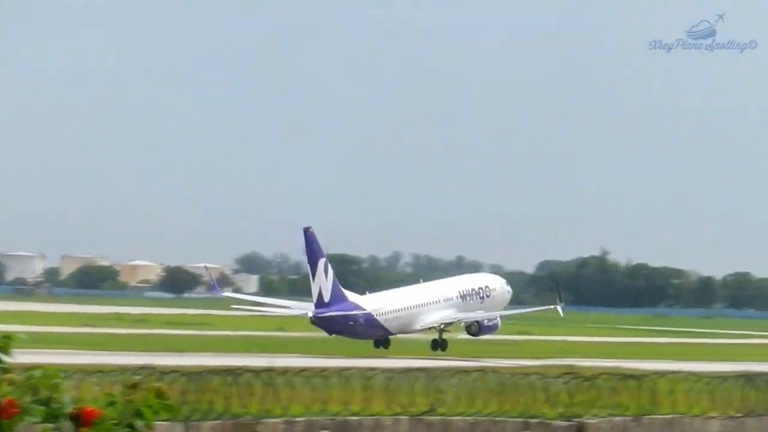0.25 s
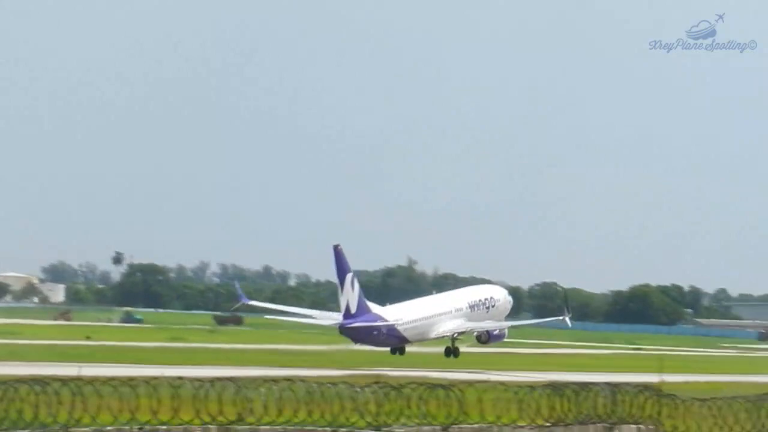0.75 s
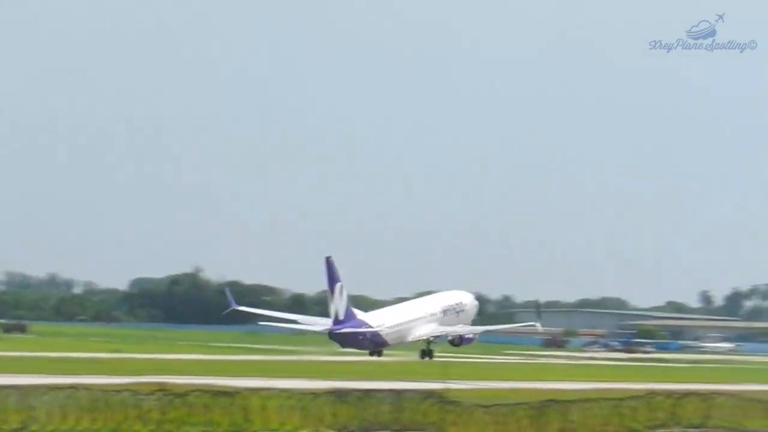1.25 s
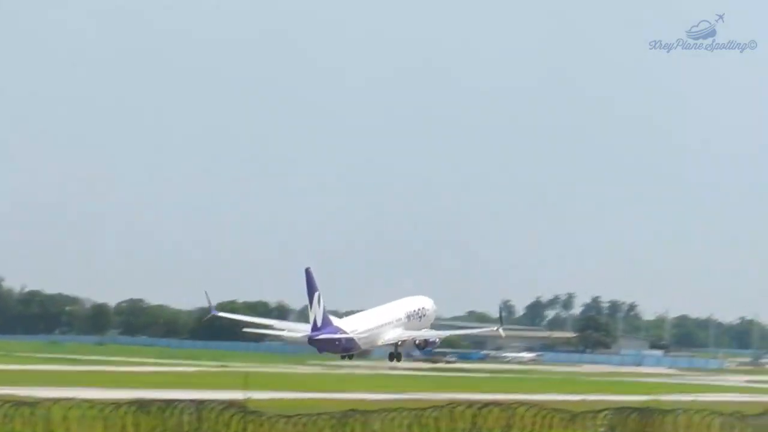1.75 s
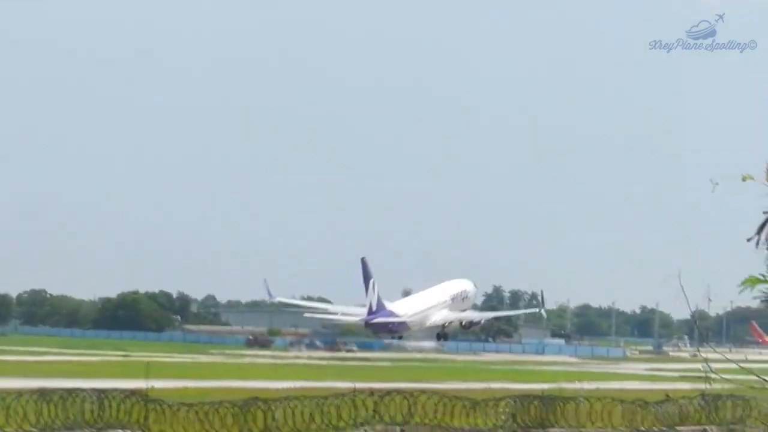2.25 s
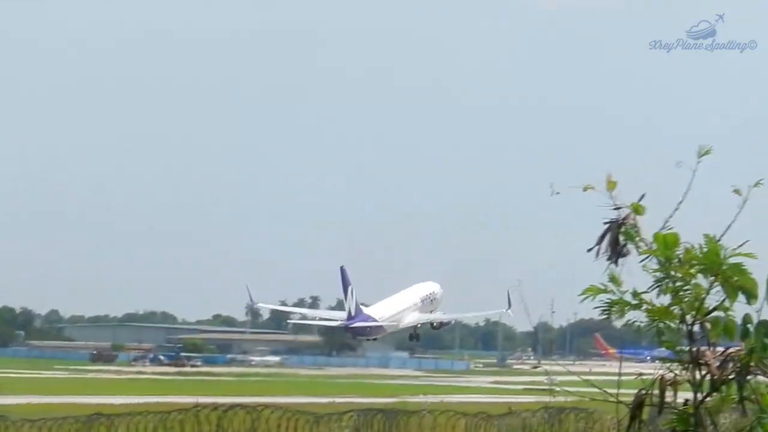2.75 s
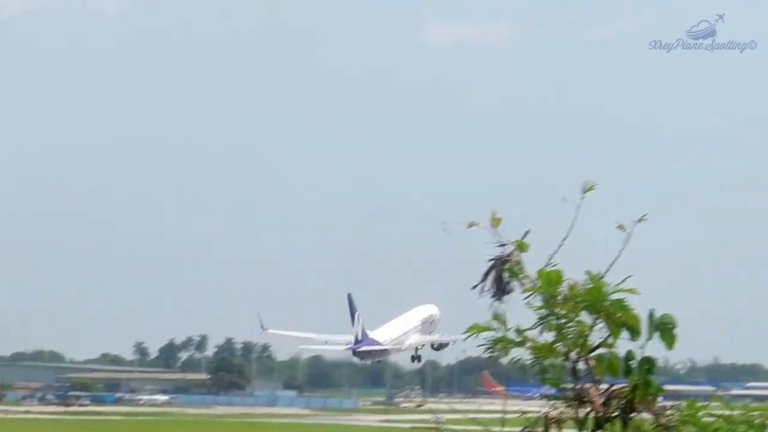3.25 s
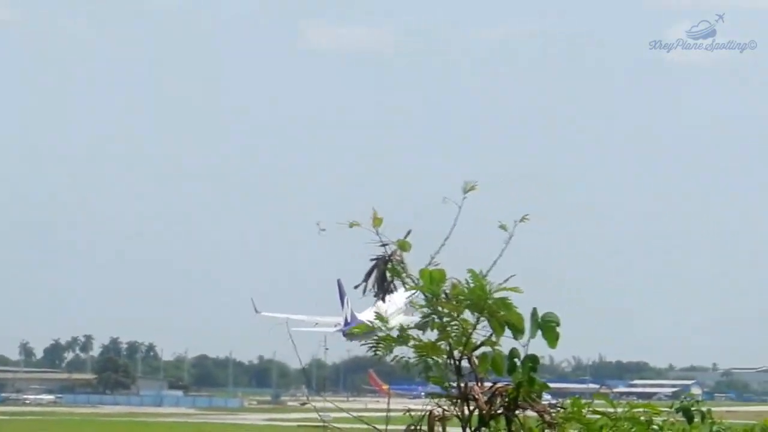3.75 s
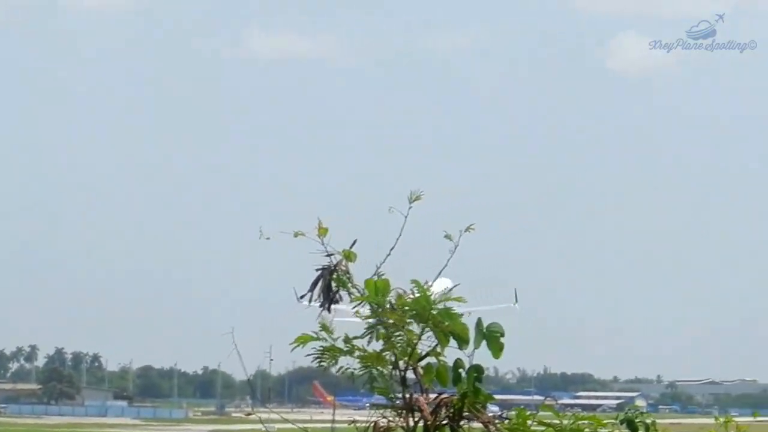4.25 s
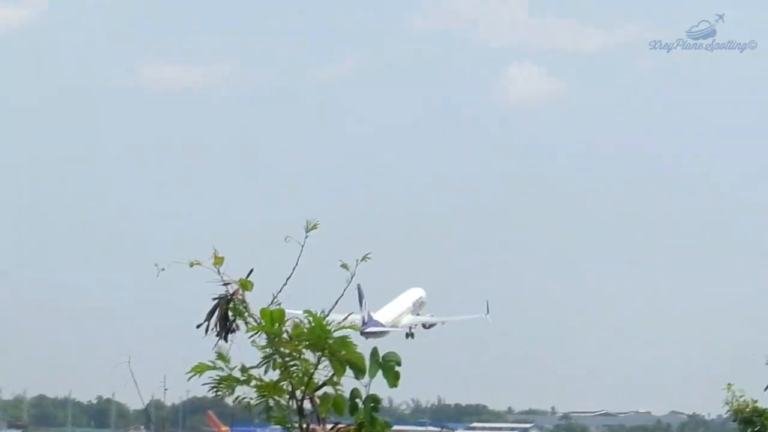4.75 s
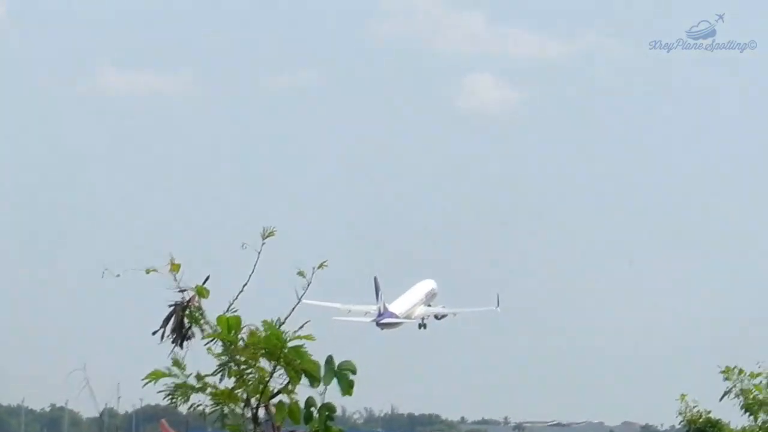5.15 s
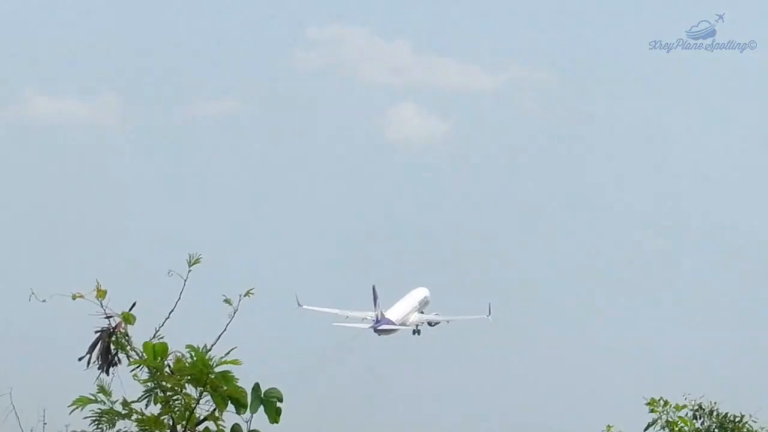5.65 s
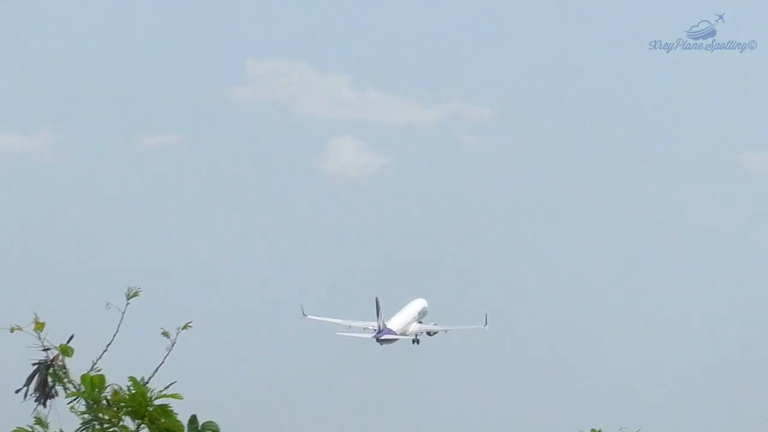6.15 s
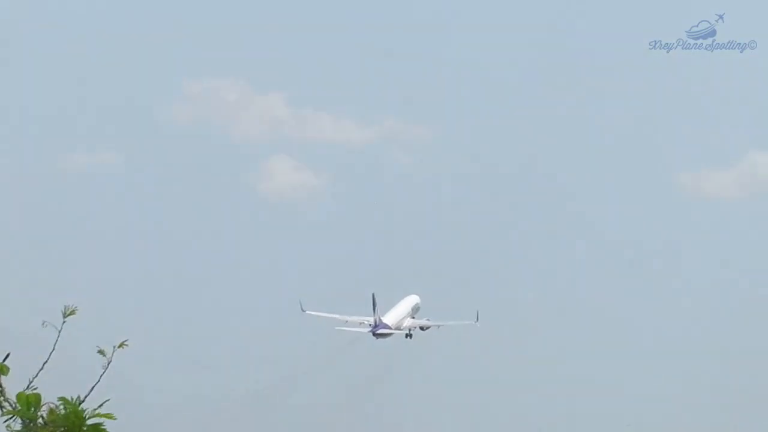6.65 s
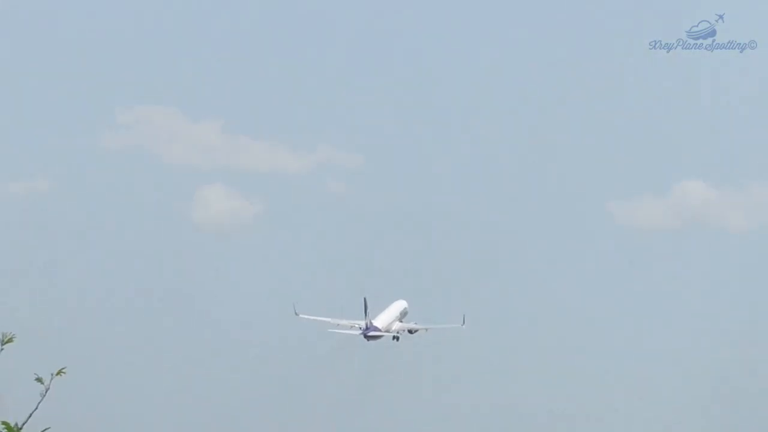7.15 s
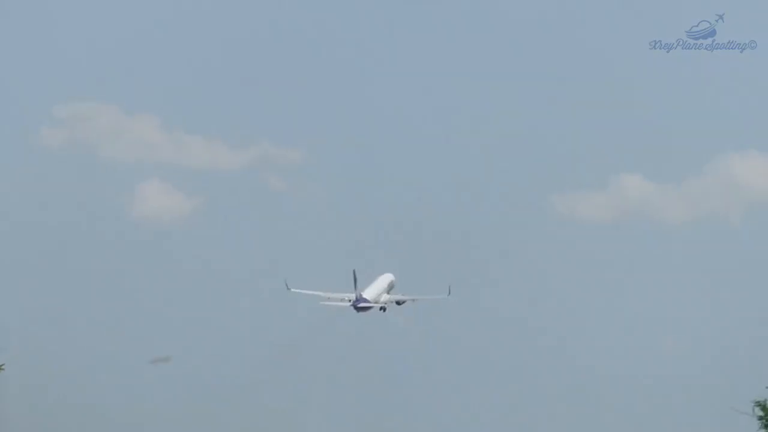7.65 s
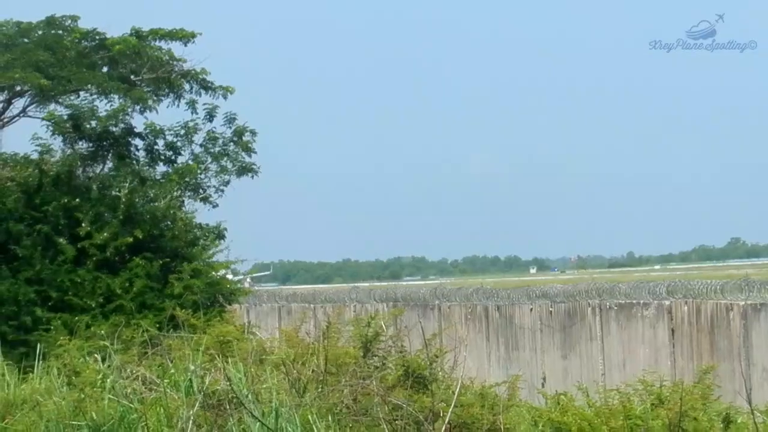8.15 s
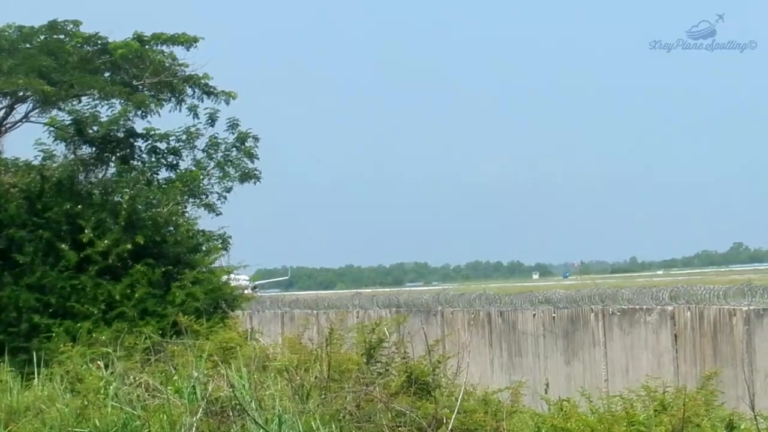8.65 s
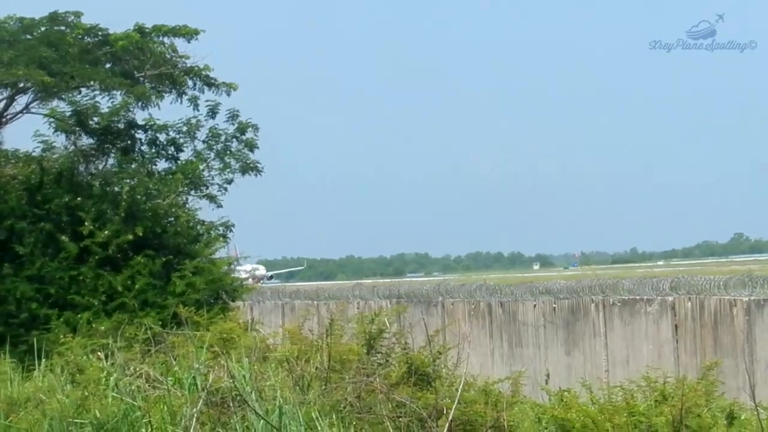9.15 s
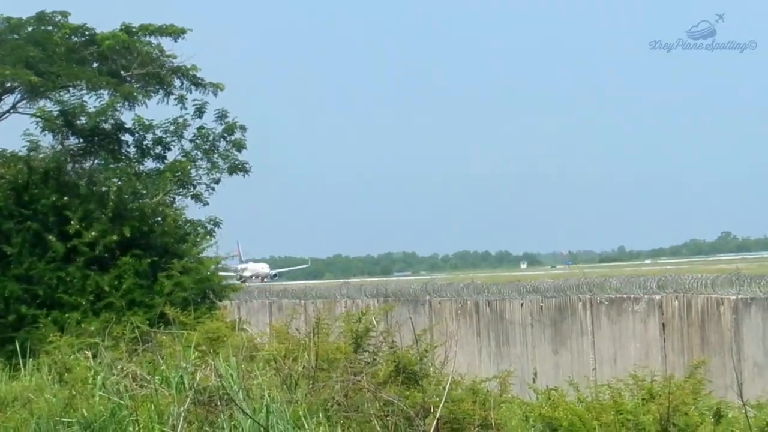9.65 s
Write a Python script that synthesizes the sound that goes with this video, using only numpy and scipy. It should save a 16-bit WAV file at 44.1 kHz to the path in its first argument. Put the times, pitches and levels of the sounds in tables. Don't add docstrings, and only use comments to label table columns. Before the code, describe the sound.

Outdoors beside an airfield, a twin-engine jet takes off and climbs away. Deep exhaust rumble and broad roar start at once, with a brief fan whine that soon fades. The overloaded small stereo microphone ducks and ticks repeatedly. At about eight seconds it cuts abruptly to a much quieter distant jet idling, with knocks on the microphone case and a final puff of wind.

```python
import sys
import numpy as np
from scipy import signal
from scipy.fft import rfft, irfft, next_fast_len
from scipy.io import wavfile
from scipy.ndimage import uniform_filter1d

SR = 44100
rng = np.random.default_rng(int(sys.argv[2]) if len(sys.argv) > 2 else 0)


def wrap_up_sound(samples):
    columns = np.atleast_2d(samples).T
    tamed = np.clip(columns, -1, 1)
    steps = np.round(tamed * 32767).astype(np.int16)
    wavfile.write(sys.argv[1], SR, steps)


def volts_from_db(level):
    exponent = np.asarray(level, float) / 20
    return 10 ** exponent


N = 436149
TIME = np.arange(N) / SR
SIZE = next_fast_len(N)
BINS_HZ = np.maximum(np.arange(SIZE // 2 + 1) * SR / SIZE, 1)
CUT_S = 8.0885
CLIMBING, IDLING = 0, 1


def rms_one(x):
    return x / np.sqrt(np.mean(x ** 2) + 1e-20)


def in_time(rows):
    s, *columns = np.transpose(rows)
    return [np.interp(TIME, s, column) for column in columns]


def at_hz(points, hz):
    points_hz, values = np.transpose(points)
    return np.interp(np.log(hz), np.log(points_hz), values)


def bumps(rows):
    return sum(db * np.exp(-((TIME - s) / half_s) ** 2) for s, db, half_s in rows)


def drift(rate_hz):
    pole = np.exp(-80 * np.pi * rate_hz / SR)
    chance = rng.standard_normal(N // 40 + 2002)
    slow = signal.lfilter([1], [1, -2 * pole, pole * pole], chance)[2000:]
    return np.interp(np.arange(N) / 40, np.arange(len(slow)), rms_one(slow))


# (centre [Hz], width [Hz], depth [dB])
HOUSING = [(1373, 146, -5), (1793, 230, -6), (2327, 200, -6.5), (2940, 140, -6), (4000, 170, -5),
           (4700, 67, -1), (6940, 360, -5)]
# (frequency [Hz], likeness [-1 to 1])
LIKENESS = [
    [(60, 0.99), (150, 0.89), (390, 0.99), (990, 1), (2530, 0.68), (6440, 0.6)],
    [(60, 0.14), (190, 1), (620, 0.84), (2000, 0.32), (6440, -0.33)],
]
# (frequency [Hz], left minus right [dB])
LEAN = [(60, -6.5), (120, -4.5), (230, -4), (450, -4), (870, -1.5), (1690, -1), (3300, 1), (6440, 4)]


def stereo_noise(colour, shot):
    mid, side = rfft(rng.standard_normal((2, SIZE)))
    alike = at_hz(LIKENESS[shot], BINS_HZ)
    pair = np.sqrt(1 + alike) * mid + np.sqrt(1 - alike) * side * [[1], [-1]]
    outside = (BINS_HZ < colour[0][0]) | (BINS_HZ > colour[-1][0])
    level_db = at_hz(colour, BINS_HZ) - 80 * outside
    level_db += sum(db * np.exp(-((BINS_HZ - hz) / width) ** 2) for hz, width, db in HOUSING)
    lean = volts_from_db(at_hz(LEAN, BINS_HZ) / 2 * np.array([[1], [-1]]))
    left_lead_rad = 0.33 * np.array([[1], [0]])
    return pair * lean * volts_from_db(level_db) * np.exp(1j * left_lead_rad)


# (frequency [Hz], density [dB per Hz])
RUMBLE_COLOUR = [
    [(12, -43.5), (20, -39), (62, -3), (81, 5), (116, -5), (178, -25), (220, -43.5), (290, -39.5),
     (480, -120)],
    [(12, -79), (20, -40), (48, -26), (59, -10.5), (74, -5.5), (92, -0.5), (127, -6.5), (173, -24.5),
     (220, -42), (290, -61), (480, -120)],
]
RUMBLE_DB = [-16.5, -27]
# (time [s], level [dB], half length [s])
EDDIES = [
    [(0.38, 2, 0.045), (0.55, -3, 0.078), (0.85, -7, 0.027), (0.92, 6, 0.025), (1.39, -11.5, 0.025),
     (1.69, 2.5, 0.11), (2.01, -8.5, 0.02), (2.59, -8.5, 0.038), (2.82, -5.5, 0.03), (3.07, -6, 0.023),
     (3.27, 5.5, 0.035), (3.44, -5, 0.03), (3.89, 1.5, 0.064), (4.11, -3, 0.032), (4.3, 3.5, 0.037),
     (4.48, 4, 0.016), (4.87, -7, 0.079), (5.25, -7.5, 0.027), (5.36, 3, 0.021), (5.53, -6, 0.033),
     (5.6, 3.5, 0.021), (5.9, -6, 0.055), (6.18, -8, 0.019), (6.39, 4.5, 0.042), (6.51, -6.5, 0.048),
     (6.6, 6, 0.026), (6.91, -4.5, 0.051), (7.28, -7, 0.03), (7.47, 5, 0.021), (8.06, -4, 0.13)],
    [(8.2, -8, 0.041), (8.32, -5, 0.034), (8.58, 5, 0.03), (8.98, 2, 0.11), (9.23, -6, 0.082),
     (9.52, 4.5, 0.024), (9.58, -6, 0.024), (9.67, -5, 0.024), (9.86, 7.5, 0.12)],
]


def rumble(shot, evenness, deep_follow):
    pair = stereo_noise(RUMBLE_COLOUR[shot], shot)
    deep_share = np.clip(np.log2(65 / BINS_HZ), 0, 1)
    hump = irfft(pair * np.sqrt(1 - deep_share), SIZE)[:, :N]
    deep = irfft(pair * np.sqrt(deep_share), SIZE)[:, :N]
    scale = np.std(hump.mean(0))
    power = (hump.mean(0) / scale) ** 2
    power = uniform_filter1d(uniform_filter1d(power, size=900), size=900)
    hump = hump / (power + 0.02) ** (evenness / 2)
    swell_db = RUMBLE_DB[shot] + bumps(EDDIES[shot])
    slow_db = uniform_filter1d(swell_db, size=20000)
    deep_db = slow_db + 3.0 + deep_follow * (swell_db - slow_db)
    return (volts_from_db(swell_db) * hump + volts_from_db(deep_db) * deep) / scale


# (frequency [Hz], density [dB per Hz])
ROAR_COLOUR = [
    [(94, -22), (160, -12.5), (199, -4), (357, -3), (1130, -9), (1590, -16.5), (1750, -20.5), (2050, -19.5),
     (2330, -28), (3290, -29.5), (6890, -48), (8960, -81.5), (15200, -120)],
    [(94, -31), (160, 3.5), (307, -2.5), (348, -7), (385, -5.5), (540, -11), (1990, -29.5), (2170, -32),
     (3200, -62), (4160, -90), (7040, -120)],
]
ROAR_CENTRES_HZ = [220, 460, 1000, 2800]
ROAR_BALANCE_DB = [
    [-38, -31, -35, -47],
    [-48, -44.5, -51.5, -62.5],
]
# (time [s], level [dB], brightness [dB per octave])
ROAR_PATH = [
    [(0.0, 3, 3), (0.5, 3, 0.6), (1.0, -0.15, 2.5), (1.5, -1, 1.3), (2.05, -3.5, 1.4), (2.4, 2, 2.3),
     (2.75, 2.5, 3.5), (3.15, 0, 1.5), (3.5, -3, 0), (4.2, -0.5, 0.1), (4.8, 0.3, 0), (5.5, 2.5, 0.2),
     (6.1, -1.2, -0.4), (6.9, -0.8, -2.0), (7.5, -2.0, -1.5), (8.08, -3, -3)],
    [(8.1, 0, -0.5), (8.6, 0, 0), (9.89, -0.5, 1)],
]
# (time [s], slope above the top centre [dB per octave])
AIR_DB_PER_OCTAVE = [
    (0, 5.5),
    (2, -2),
    (8, -12),
]
# (time [s], level [dB], half length [s], centre [Hz])
POCKETS = [(0.19, 5.5, 0.075, 1700), (0.2, 6.5, 0.036, 6000), (0.26, -4.5, 0.35, 420),
           (0.48, -4.5, 0.087, 3400), (0.7, 3, 0.2, 850), (2.25, 3.5, .5, 210), (2.548, -1.5, 0.32, 600),
           (2.59, 4, 0.25, 1700), (3.587, -5.5, 0.11, 292), (3.647, 4.5, 0.7, 1170),
           (3.669, -2, 0.55, 3400), (4.688, 5, 0.14, 855), (5.518, -5.5, 0.2, 210), (5.673, 5.5, 0.76, 420),
           (6.212, -7.5, .1, 210), (6.532, -3, .3, 1210), (7.44, -3, 0.84, 1150), (7.66, 3, .18, 420)]


def roar(shot, patchy_db):
    pair = stereo_noise(ROAR_COLOUR[shot], shot)
    path_db, brightness = in_time(ROAR_PATH[shot])
    air_slope = in_time(AIR_DB_PER_OCTAVE)[0]
    edges = np.searchsorted(BINS_HZ, [170, 300, 700, 1500, 6500])
    power = np.abs(pair.mean(0)) ** 2 * 2 / SIZE ** 2
    region_power = [power[a:b].sum() for a, b in zip(edges, edges[1:])]
    balance_db = ROAR_BALANCE_DB[shot] - 10 * np.log10(region_power)
    third_hz, top_hz = ROAR_CENTRES_HZ[-2:]
    out, together, neighbour = 0, drift(18), drift(2.6)
    for hz in 150 * 2 ** np.arange(0, 6.5, .5):
        window = np.cos(np.pi * np.clip(np.log2(BINS_HZ / hz), -.5, .5)) ** 2
        level_db = np.interp(np.log(hz), np.log(ROAR_CENTRES_HZ), balance_db) + path_db
        level_db += brightness * np.log2(min(hz, top_hz) / third_hz)
        for s, db, half_s, centre_hz in POCKETS:
            octaves = np.log2(hz / centre_hz)
            if abs(octaves) < 2:
                level_db += bumps([(s, db * np.exp(-(octaves / 0.8) ** 2), half_s)])
        air_db = air_slope * max(np.log2(hz / top_hz), 0)
        own = drift(11.0)
        flicker_db = patchy_db * (0.25 * together + 0.62 * own + 0.5 * neighbour)
        out = out + volts_from_db(level_db + air_db + flicker_db) * irfft(pair * window, SIZE)[:, :N]
        neighbour = own
    return out


# (time [s], lag [ms], strength [0-1])
GROUND = [(0, 0.32, 0.3), (1.8, 0.34, 0), (2.3, 0.95, 0.26), (3.2, 0.71, 0.23), (4, 1.08, 0.17),
          (4.8, 2.22, 0.2), (6, 2.27, 0.08), (7, 2.9, 0), (8.1, 3.1, 0.1)]


def ground_echo(x):
    lag_ms, strength = in_time(GROUND)
    dull = signal.sosfilt(signal.butter(1, 2200, fs=SR, output="sos"), x)
    echo = np.array([np.interp(TIME - lag_ms / 1000, TIME, channel) for channel in dull])
    return (x + strength * echo) / np.sqrt(1 + strength ** 2 / 2)


def whine(start_s, law, flares, tones, wobble, fading_db):
    level_db, db_per_s, speed_up = law
    since_s = TIME - start_s
    turns = np.cumsum(1 + speed_up * since_s + wobble * drift(6.3)) / SR
    lines = 0
    for hz, db in tones:
        lines = lines + volts_from_db(db + fading_db * drift(7.6)) * np.sin(2 * np.pi * hz * turns)
    return np.sqrt(2) * volts_from_db(level_db + db_per_s * since_s + bumps(flares)) * lines


# (first level [dB], change [dB per s], shaft speed-up [per s])
FAN_LAW = (-49.5, -8, 0)
# (time [s], level [dB], half length [s])
FAN_FLARES = [(0.18, 14, .07), (0.75, 8, .06), (0.92, 10, .04), (1.27, 11, .08)]
# (frequency [Hz], level [dB])
FAN_TONES = [(1593, -0.5), (3192, -32.5), (4285, -21.5), (5335, -28.5)]


def climbing_whine():
    return whine(0, FAN_LAW, FAN_FLARES, FAN_TONES, wobble=.002, fading_db=2.0)


def line_scan():
    return volts_from_db(-94.5) * np.sin(2 * np.pi * 15734 * TIME)


# (frequency [Hz], density [dB per Hz])
HISS = [(500, -5.5), (3000, 4), (7000, -2), (12000, -4), (14000, -6.5), (16000, -4)]
HISS_DB = [-66, -63]
HISS_LIKENESS = [0., -0.29]


def hiss():
    noise = rfft(rng.standard_normal((2, SIZE))) * volts_from_db(at_hz(HISS, BINS_HZ))
    mid, side = irfft(noise, SIZE)[:, :N]
    alike = np.where(TIME < CUT_S, *HISS_LIKENESS)
    pair = np.sqrt(1 + alike) * mid + np.sqrt(1 - alike) * side * [[1], [-1]]
    return volts_from_db(np.where(TIME < CUT_S, *HISS_DB)) * pair / np.std(mid)


# (time [s], gain drop [dB], crest [dB])
TRIPS = [(0.0622, 6, -7.5), (0.2539, 0, -8), (0.3624, 4, -6.5), (0.6361, 4.5, -8.5), (0.7812, 7, -7),
         (1.404, 4.5, -11), (1.5003, 2, -8), (1.7561, 2.5, -7.5), (1.92, 5, -9), (2.213, 5.5, -7.5),
         (2.4119, 4, -5), (2.5104, 5, -8), (2.9221, 2.5, -4), (3.1708, 7, -5.5), (3.3774, 7.5, -4),
         (3.9147, 3, -3), (4.543, 5, -12), (4.8, 2.5, -5), (5.0258, 2.0, -8.5), (5.277, 6, -17),
         (5.6049, 4, -5), (5.8787, 4.0, -12), (5.997, 4, -6), (6.3481, 6, -11), (6.8603, 6, -11),
         (7.3643, 6, -8.5)]


def crests(low):
    hits, marks = np.zeros(N), np.zeros(N)
    t, crest_hz = np.arange(-1500, 1500) / SR, 90
    bell = np.exp(-(t / 0.0071) ** 2)
    wave = bell * (np.cos(2 * np.pi * crest_hz * t) + 0.094 * np.cos(4 * np.pi * crest_hz * t))
    for s, _, db in TRIPS:
        at = round(s * SR)
        hits[at] = volts_from_db(db - 1) * np.sign(low[1, at])
        marks[at] = 1
    gathered = np.clip(signal.oaconvolve(marks, bell, "same"), 0, 1)
    return low * (1 - gathered) + signal.oaconvolve(hits, wave, "same") * volts_from_db([[-2.5], [2.5]])


def gain_control():
    drops, t, recovery_s = np.zeros(N), np.arange(SR) / SR, 0.12
    for s, drop_db, _ in TRIPS:
        drops[round(s * SR)] = 0.77 * drop_db
    recovery = (1 + 0.5 * t / recovery_s) * np.exp(-t / recovery_s)
    duck_db = signal.oaconvolve(drops, recovery)[:N] * (TIME < CUT_S)
    pole = np.exp(-1 / (0.00025 * SR))
    sudden = np.array([[.2], [.04]])
    eased_db = sudden * duck_db + (1 - sudden) * signal.lfilter([1 - pole], [1, -pole], duck_db)
    return volts_from_db(1.56 * (TIME < CUT_S) - eased_db)


# (time [s], peak [dB], low edge [Hz], high
# edge [Hz], 60 dB decay [s])
TICKS = [(4.165, -51, 4000, 12000, 0.023), (6.305, -47, 2000, 9000, 0.026), (6.648, -47, 2500, 8000, 0.033),
         (7.637, -41, 1200, 6450, 0.035), (7.637, -29, 1100, 1800, 0.04), (7.636, -52, 9600, 12600, 0.018),
         (7.749, -45, 2000, 9000, 0.022), (8.0886, -33, 302, 15800, .005), (8.177, -35, 300, 1200, .04),
         (8.2707, -28, 800, 2290, 0.014), (8.2705, -41, 2400, 7500, .01), (8.2705, -48, 5700, 6800, .03),
         (8.316, -37, 500, 1190, .04), (8.375, -32, 300, 1170, .05), (8.6047, -32, 606, 1780, 0.032),
         (8.6055, -45.5, 1800, 3200, 0.03), (8.621, -23.5, 345, 1440, 0.032), (8.634, -35, 400, 1550, 0.09),
         (8.662, -32, 447, 1490, 0.12), (8.711, -37, 398, 1360, .06), (8.726, -37, 400, 1380, 0.045),
         (9.283, -48, 400, 1500, 0.041)]


def ticks():
    out, t = np.zeros(N), np.arange(4000) / SR
    for s, db, low_hz, high_hz, t60 in TICKS:
        burst = rng.standard_normal(len(t)) * volts_from_db(-60 * t / t60)
        burst[0] = 6.1
        case = signal.butter(6, [low_hz, high_hz], "band", fs=SR, output="sos")
        burst = signal.sosfilt(case, burst)
        at = round(s * SR)
        out[at:at + len(t)] += volts_from_db(db) * burst / np.abs(burst).max()
    return out * volts_from_db([[-1.0], [1.0]])


# (first level [dB], change [dB per s], shaft speed-up [per s])
IDLE_LAW = (-83.5, 3, .009)
# (time [s], level [dB], half length [s])
IDLE_FLARES = [(8.19, 13, .04), (8.74, 7.3, .05), (9.0, 9, 0.21), (9.4, 4, .15), (9.77, 8.8, .06)]
# (frequency [Hz], level [dB])
IDLE_TONES = [(2130, 5.5), (1060, 10.5), (878, 2), (1405, -2), (1495, 4), (1672, 1.5)]


def idling_whine():
    return whine(CUT_S, IDLE_LAW, IDLE_FLARES, IDLE_TONES, wobble=.0008, fading_db=3.0)


# (time [s], level [dB])
GUST = [
    (9.6, -38),
    (9.614, -40),
    (9.622, -55),
    (9.762, -45),
    (9.818, -33.5),
    (9.842, -24),
    (9.87, -27),
]


def gust():
    shared, left, right = rng.standard_normal((3, N))
    band = signal.butter(4, [110, 330], "band", fs=SR, output="sos")
    noise = signal.sosfilt(band, shared + 0.2 * np.array([left, right]))
    noise = noise * volts_from_db(1.3 * drift(25) + [[-3.5], [3.5]])
    onset = np.clip((TIME - GUST[0][0]) / 0.07, 0, 1)
    return volts_from_db(in_time(GUST)[0] + 1.5) * rms_one(noise) * onset


def scene():
    climbing = crests(rumble(CLIMBING, evenness=0.59, deep_follow=0.33))
    climbing += ground_echo(roar(CLIMBING, patchy_db=1.5)) + climbing_whine()
    idling = rumble(IDLING, evenness=0.46, deep_follow=.3) + roar(IDLING, patchy_db=1.2)
    idling += idling_whine() + gust()
    return np.where(TIME < CUT_S, climbing, idling) + ticks() + line_scan()


def top_cut(x):
    return signal.sosfilt(signal.butter(12, 15830, fs=SR, output="sos"), x)


def record(dry):
    gain = gain_control()
    loud = dry * gain + hiss() * gain ** 2.0
    rounded = loud / (1 + (loud / .92) ** 8) ** (1 / 8)
    return top_cut(rounded)


dry = scene()
out = record(dry)
wrap_up_sound(out)
```